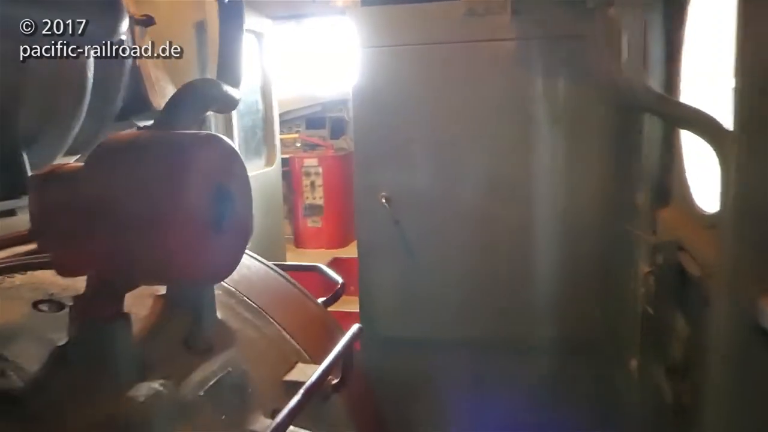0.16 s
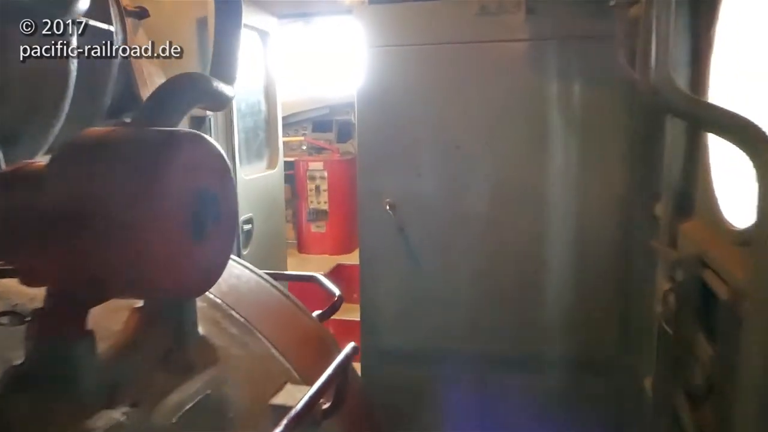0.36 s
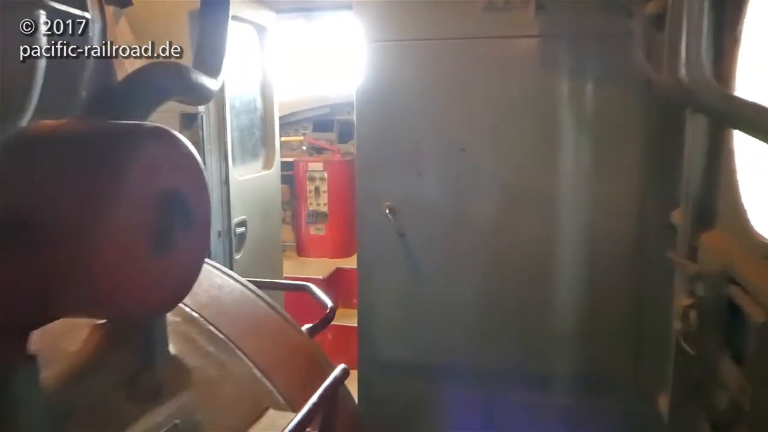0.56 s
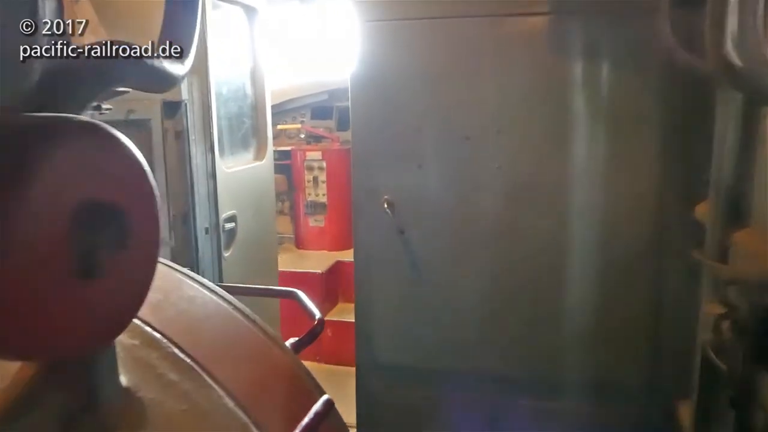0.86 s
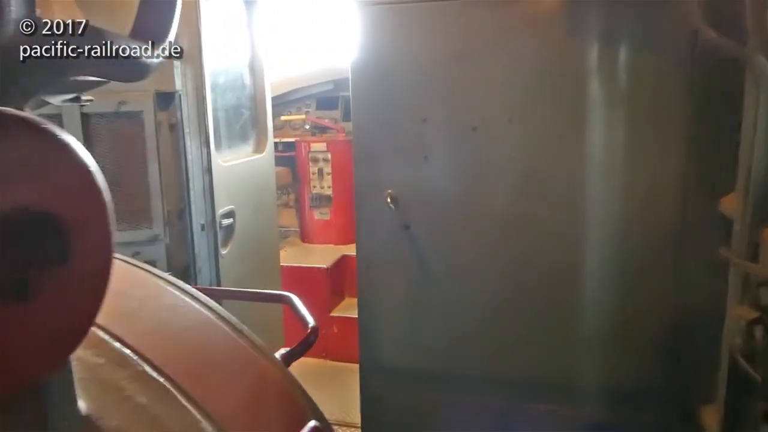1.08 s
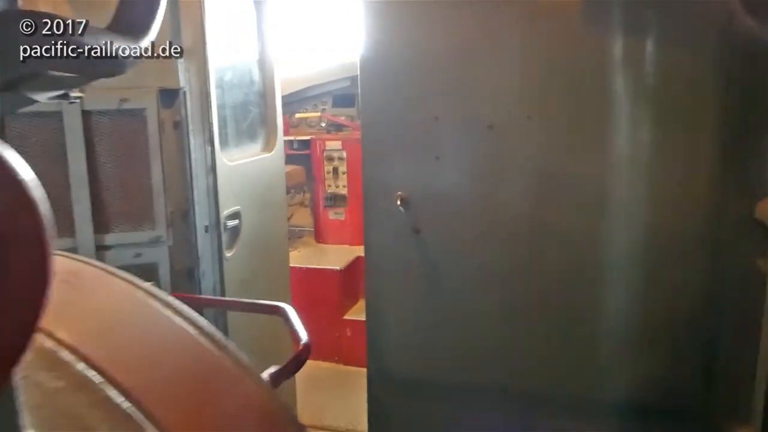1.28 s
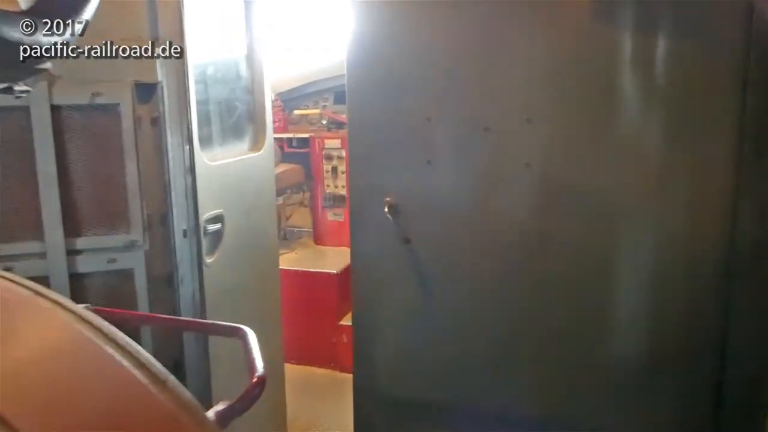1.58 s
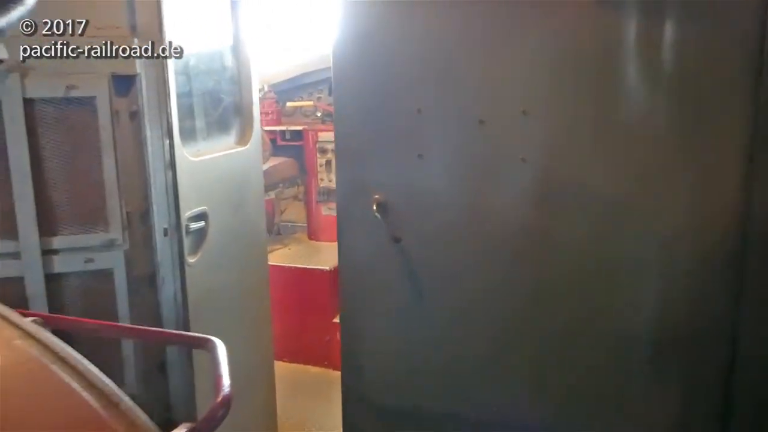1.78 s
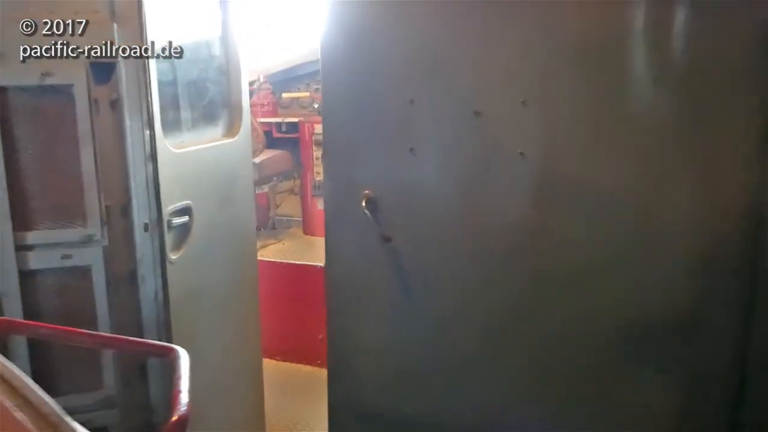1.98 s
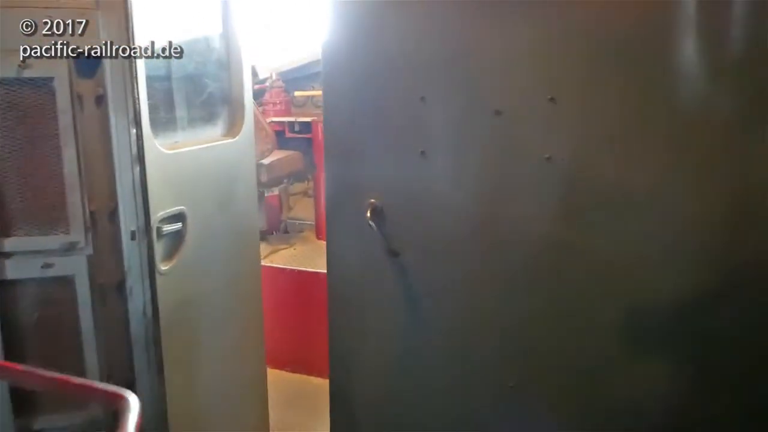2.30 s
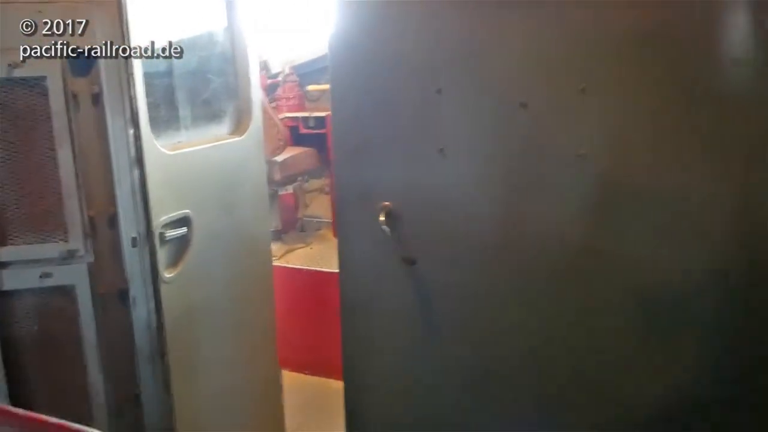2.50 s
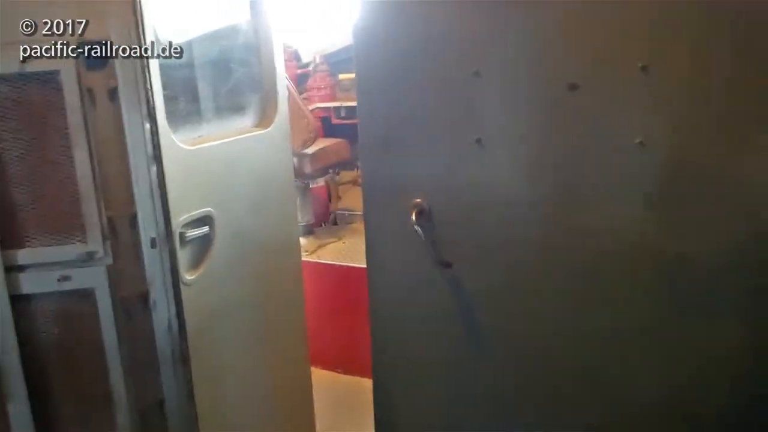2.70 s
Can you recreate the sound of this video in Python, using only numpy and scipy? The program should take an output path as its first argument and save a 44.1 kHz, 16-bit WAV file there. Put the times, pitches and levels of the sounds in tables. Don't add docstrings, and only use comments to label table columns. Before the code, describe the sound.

A large diesel engine idles throughout, a thick low drone around 100 to 190 hertz in a reverberant steel room. Floor shudder is strongest near 0.5 s, then eases. The drone dips around 0.9 to 1.2 s and swells again from 1.3 to 2.4 s, its pitch sagging very slightly. Ringing panel roar, smeared valve clatter, smooth air hiss and faint pulsing whistle continue to the end at about 2.9 s.

```python
import sys
import numpy as np
from scipy import signal
from scipy.fft import rfft, irfft
from scipy.io import wavfile

SR = 44100
rng = np.random.default_rng(int(sys.argv[2]) if len(sys.argv) > 2 else 0)


def voltage_ratio(decibels):
    exponent = np.asarray(decibels, float) / 20
    return 10 ** exponent


def output_pcm(signal):
    pcm = np.clip(np.atleast_2d(signal).T, -1, 1) * 32767
    wavfile.write(sys.argv[1], SR, np.round(pcm).astype(np.int16))


N = 125685
T_S = np.arange(N) / SR
HZ = np.maximum(np.fft.rfftfreq(N, 1 / SR), 1)
LEFT_RIGHT = np.array([[1], [-1]])


def rms_one(x):
    return x / np.sqrt(np.mean(x ** 2) + 1e-20)


def in_time(rows):
    s, *columns = np.transpose(rows)
    return [np.interp(T_S, s, c) for c in columns]


def at_hz(points, axis=1):
    points = np.array(points)
    return np.interp(np.log(HZ), np.log(points[:, 0]), points[:, axis])


def drift(rate_hz):
    step, settle = 40, 2000
    pole = np.exp(-2 * np.pi * rate_hz * step / SR)
    draws = rng.standard_normal(N // step + 2 + settle)
    slow = signal.lfilter([1], [1, -2 * pole, pole ** 2], draws)[settle:]
    return np.interp(np.arange(N) / step, np.arange(len(slow)), rms_one(slow))


def resonance(hz, width_hz):
    return 1 / np.sqrt(1 + (2 * (HZ - hz) / width_hz) ** 2)


def pan(left_over_right_db):
    return voltage_ratio(LEFT_RIGHT / 2 * left_over_right_db)


# frequency in Hz, likeness 0-1, left over right in dB.
PORTS = [(35, 0.7, 3), (130, 0.9, 6.5), (300, 0.76, 3), (640, 0.58, 1.6), (1400, 0.7, 0.5),
         (3100, 0.62, 1.3), (6740, 0.41, 1.6), (15000, 0.3, .6)]


def noise(gain):
    mid, side = rfft(rng.standard_normal((2, N)))
    alike = at_hz(PORTS)
    both = np.sqrt(1 + alike) * mid + LEFT_RIGHT * np.sqrt(1 - alike) * side
    out = irfft(gain * both * pan(at_hz(PORTS, axis=2)), N)
    return out / np.sqrt(np.mean(out.mean(axis=0) ** 2))


def order_tone(turns, order, gain):
    wander_rad = 0.2 * drift(2.0)
    apart_rad = 0.19 * drift(1.9)
    phase = 2 * np.pi * order * turns + rng.uniform(0, 2 * np.pi) + wander_rad
    wave = np.sin(phase + LEFT_RIGHT * apart_rad)
    flutter = voltage_ratio(0.9 * drift(8))
    return np.sqrt(2) * gain * flutter * wave * pan(5.2 + 0.48 * drift(0.57))


def mains_hum():
    hum_hz, level_db = 100.1, -50
    return order_tone(T_S, hum_hz, voltage_ratio(level_db))


# frequency in Hz, level in dB per Hz.
HISS = [(1200, -40), (3000, -1), (4500, -.5), (6300, -.5), (7600, -6.5), (10800, -11.5), (13700, -17.5),
        (15700, -20)]


def air_hiss():
    level_db = -57 + 0.2 * drift(4.6)
    return voltage_ratio(level_db) * noise(voltage_ratio(at_hz(HISS)))


# frequency in Hz, width in Hz, level in dB against the control, share of its swing.
WHISTLE = [(5800, 1000, 4, .1), (8760, 600, 3, .5), (9300, 500, -4, .5), (11580, 400, -3, 1.1),
           (12480, 400, -13, .3), (14850, 600, -10, .6)]


def air_whistle(turns, whistle_db):
    depth, sharpness = 0.062, 3
    beat = np.exp(sharpness * np.cos(2 * np.pi * turns)) - np.i0(sharpness)
    pulse = 1 + depth * rms_one(beat)
    mean_db = whistle_db.mean()
    out = 0
    for hz, width_hz, db, share in WHISTLE:
        level_db = mean_db + db + share * (whistle_db - mean_db) + 0.52 * drift(13)
        out = out + voltage_ratio(level_db) * pulse * noise(resonance(hz, width_hz) ** 2)
    return out


# time in seconds, level in dB.
SHUDDER = [
    (0, -40),
    (.3, -38),
    (.55, -37.5),
    (.8, -42.5),
    (1.2, -41.5),
    (2.0, -42),
    (2.85, -43),
]
# frequency in Hz, level in dB per Hz.
SHUDDER_COLOUR = [(15, -6), (25, -3), (45, 7.5), (90, 8), (140, 4.5), (195, 9), (230, -11), (500, -77)]


def floor_shudder():
    level_db, = in_time(SHUDDER)
    return voltage_ratio(level_db) * noise(voltage_ratio(at_hz(SHUDDER_COLOUR)))


# frequency in Hz, width in Hz, lift in dB.
PANELS = [(350, 14, 1.5), (428, 65, 2), (596.8, 9.7, 7), (900, 58, 2), (1330, 20, 1.5)]


def panel_lift_db():
    return sum(db * resonance(hz, width_hz) ** 2 for hz, width_hz, db in PANELS)


# frequency in Hz, level in dB per Hz.
CLATTER = [(400, -25), (900, -1.5), (1300, -1), (1650, -5), (2100, -4), (2700, -13), (3500, -23.5),
           (7000, -74)]


def valve_clatter(roar_db):
    level_db = -50.5 + 0.84 * (roar_db - roar_db.mean()) + 0.57 * drift(2.3)
    return voltage_ratio(level_db) * noise(voltage_ratio(at_hz(CLATTER) + panel_lift_db()))


# frequency in Hz, level in dB per Hz.
ROAR = [(120, -43), (215, -3), (270, -1), (370, -2), (480, -5), (650, -8), (1100, -13.5), (2500, -77)]


def block_roar(roar_db):
    level_db = roar_db - 1.5 + 0.28 * drift(3)
    return voltage_ratio(level_db) * noise(voltage_ratio(at_hz(ROAR) + panel_lift_db()))


STRONG_ORDERS = [8, 11, 13, 14]
# time in seconds, then orders 8, 11, 13 and 14 in dB.
DRONE = [(0, -44.5, -38.5, -43, -43.5), (.3, -33, -28, -41.5, -48.5), (.5, -34, -29.5, -36.5, -46),
         (.7, -46, -30.5, -40, -41), (.9, -48, -31, -36, -47), (1.1, -55, -35.5, -40.5, -46.5),
         (1.22, -36.5, -46, -43, -45), (1.35, -30, -37, -39.5, -41), (1.55, -32.5, -39, -41, -38),
         (1.72, -35, -44, -38, -42), (1.9, -29.5, -38, -40.5, -43), (2.1, -31, -38, -39.5, -40),
         (2.3, -27, -41.5, -51, -39), (2.5, -37.5, -33, -65, -55), (2.7, -34, -36.5, -54.5, -52),
         (2.85, -32, -44, -41, -50)]
# order, level in dB, change in dB per s, standing-wave depth 0-1, loudest time in seconds.
WEAK_ORDERS = [(2, -56, 3, 0.3, 2.9), (3, -51, -0.5, 0.36, 0.28), (4, -47.5, -3.5, 0.2, 1.4),
               (5, -47.5, 0.5, 0.1, 0.13), (6, -50.5, -1, 0.9, 0.62), (7, -41.5, -5.5, 0.5, 0.44),
               (9, -49.5, -2, 0.2, 0.54), (10, -48.5, -1, 0.26, 0.4), (12, -43.5, 0.1, 0.33, 1.58),
               (15, -45, -3, 0.5, 0.44), (18, -52.5, -1.5, 0.38, 0.94), (19, -52.5, -2, 0.57, 0.57),
               (21, -47, -4, 0.4, 0.77), (26, -59.5, 0, 0.36, 0.59), (27, -58, -3, 0.57, 0.84)]


def crank_drone(speed_hz, turns):
    walk_m_per_s, sound_m_per_s = 0.793, 346
    out = 0
    for order, level_db in zip(STRONG_ORDERS, in_time(DRONE)):
        out = out + order_tone(turns, order, voltage_ratio(level_db))
    for order, db, change_db_per_s, depth, loud_s in WEAK_ORDERS:
        period_s = sound_m_per_s / (2 * order * speed_hz.mean() * walk_m_per_s)
        standing = np.abs(1 + depth * np.exp(2j * np.pi * (T_S - loud_s) / period_s))
        out = out + order_tone(turns, order, voltage_ratio(db + change_db_per_s * T_S) * standing)
    return out


# time in seconds, turns per second in Hz.
CRANK = [
    (0, 13.41),
    (.7, 13.39),
    (1.2, 13.29),
    (2.0, 13.28),
    (2.4, 13.18),
    (2.85, 13.17),
]
# time in seconds, roar level in dB, whistle level in dB.
WALK = [(0, -42, -75.5), (.2, -41.5, -75), (.42, -40, -78), (.52, -41.5, -72.5), (.9, -42.5, -71.5),
        (1.1, -42, -73), (1.35, -42, -71.5), (1.55, -41, -76), (1.9, -43, -70), (2.15, -42, -71),
        (2.45, -43, -69), (2.65, -43.5, -69), (2.85, -44, -74)]


def scene():
    speed_hz, = in_time(CRANK)
    turns = np.cumsum(speed_hz) / SR
    roar_db, whistle_db = in_time(WALK)
    background = mains_hum() + air_hiss() + air_whistle(turns, whistle_db)
    engine = floor_shudder() + valve_clatter(roar_db) + block_roar(roar_db)
    return background + engine + crank_drone(speed_hz, turns)


def roll_off(x):
    return signal.sosfilt(signal.butter(12, 15610, fs=SR, output="sos"), x)


def record(dry):
    return roll_off(dry)


dry = scene()
out = record(dry)
output_pcm(out)
```